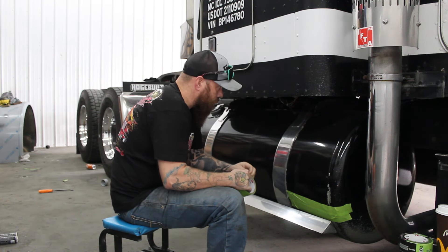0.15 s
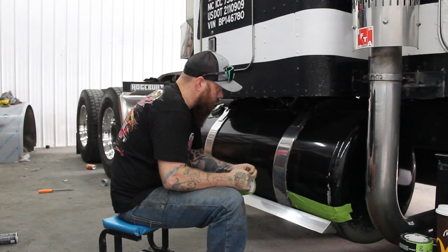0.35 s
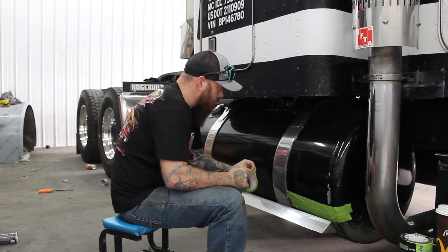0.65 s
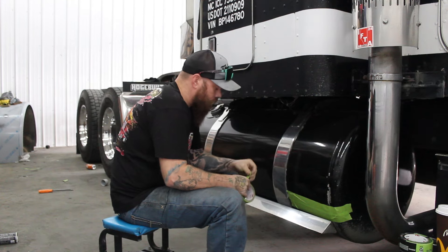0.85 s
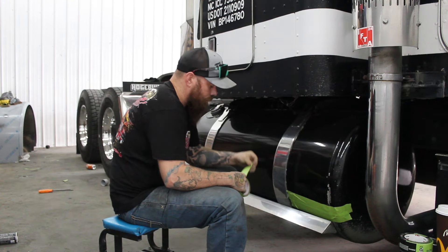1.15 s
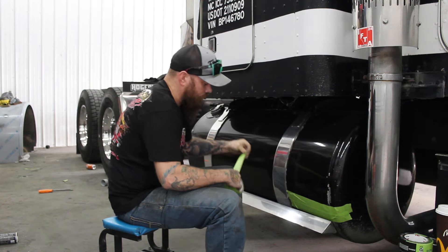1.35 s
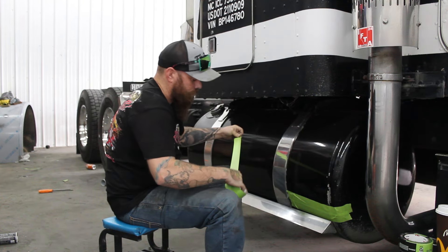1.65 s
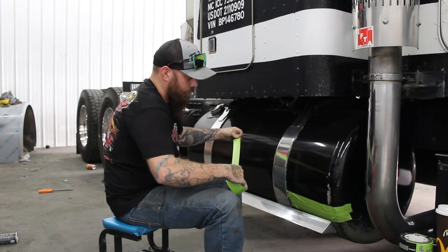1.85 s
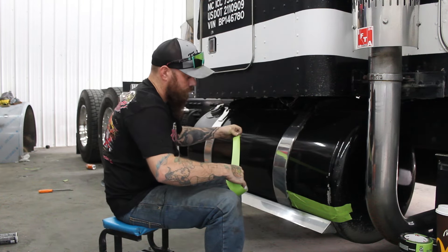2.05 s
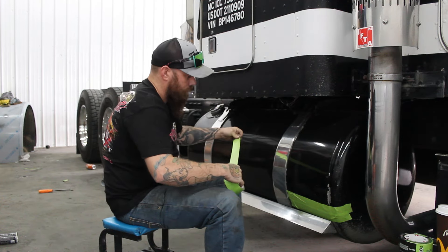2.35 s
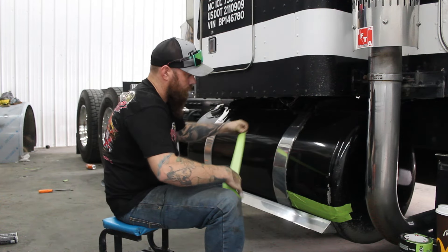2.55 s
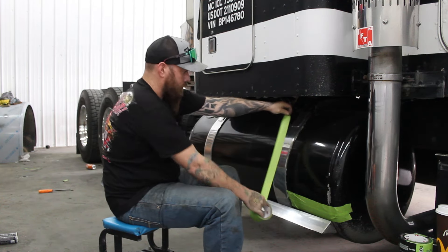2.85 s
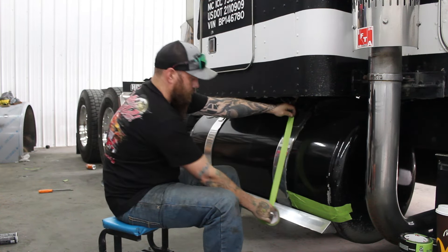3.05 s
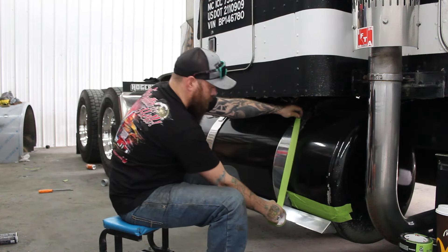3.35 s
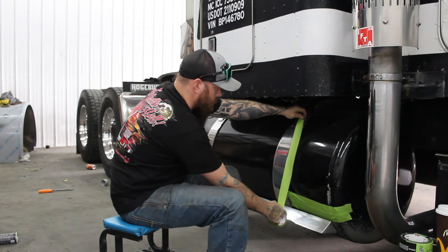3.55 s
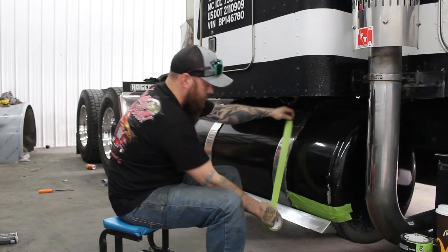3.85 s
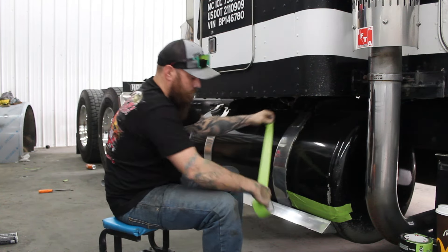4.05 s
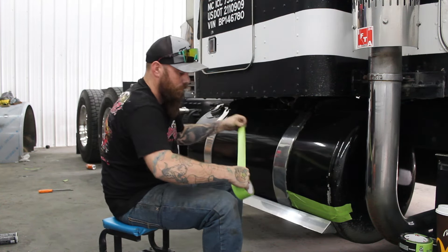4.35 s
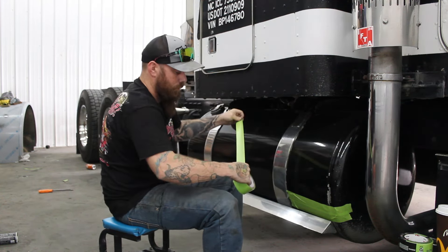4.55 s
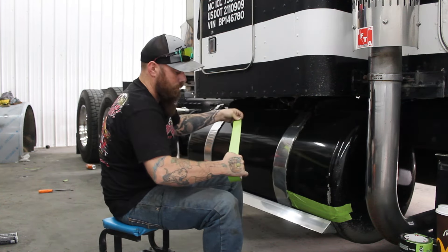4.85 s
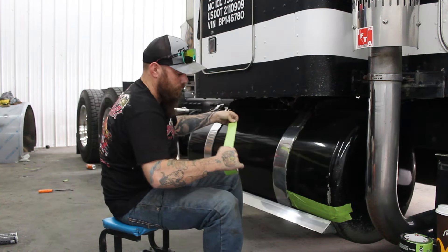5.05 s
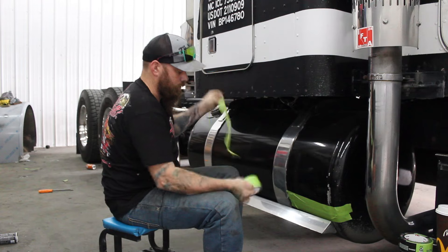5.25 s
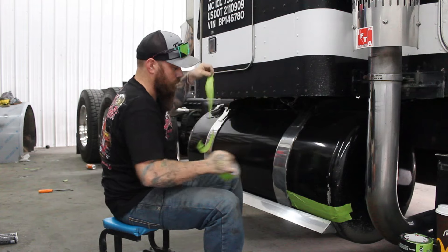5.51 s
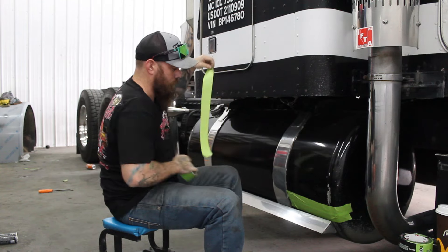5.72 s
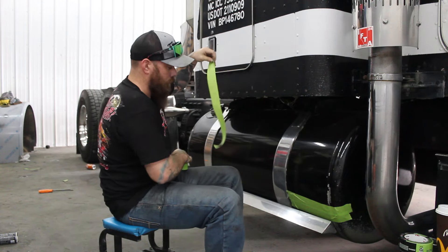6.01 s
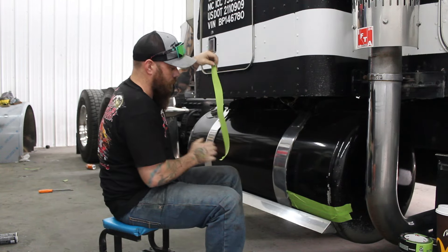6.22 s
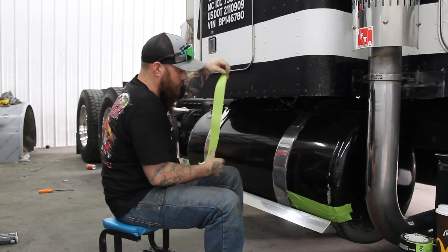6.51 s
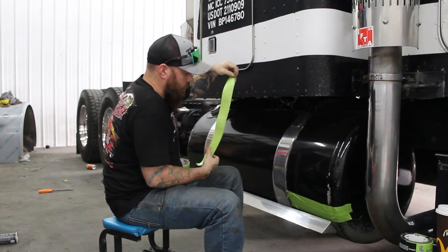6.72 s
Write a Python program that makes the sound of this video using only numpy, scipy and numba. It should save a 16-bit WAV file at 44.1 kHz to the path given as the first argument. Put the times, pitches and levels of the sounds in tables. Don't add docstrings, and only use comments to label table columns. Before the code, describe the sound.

Masking tape comes off its roll in a few violent, crackling pulls, each leaving over a second of hall reverberation. After the long rip, things calm down to soft finger crinkles and dull shuffles, then a dry triple snap, and later a sharp papery tear. Ventilation rumbles and hisses underneath with an early whine that fades. The mono microphone dips in level after the loudest rips.

```python
import sys
import numpy as np
from scipy import signal
from scipy.fft import rfft, irfft, next_fast_len
from scipy.io import wavfile
from scipy.ndimage import uniform_filter1d
from numba import njit

SR = 44100
rng = np.random.default_rng(int(sys.argv[2]) if len(sys.argv) > 2 else 0)


def output_pcm(signal):
    pcm = np.clip(np.atleast_2d(signal).T, -1, 1) * 32767
    wavfile.write(sys.argv[1], SR, np.round(pcm).astype(np.int16))


def field_ratio(decibels):
    return 10 ** (np.asarray(decibels, dtype=float) / 20)


N = 303270


def on_log(table, hz):
    rows = np.array(table, float)
    return np.interp(np.log(np.maximum(hz, 1)), np.log(rows[:, 0]), rows[:, 1])


def colour(x, gain_db):
    size = next_fast_len(len(x) + 2048)
    cepstrum = irfft(gain_db(np.fft.rfftfreq(size, 1 / SR)) * np.log(10) / 20, size)
    cepstrum[1:size // 2] *= 2
    cepstrum[size // 2 + 1:] = 0
    return irfft(rfft(x, size) * np.exp(rfft(cepstrum)), size)


def unit(x):
    return x / np.sqrt(np.mean(x ** 2))


def band(x, hz, width):
    return signal.lfilter(*signal.iirpeak(hz, hz / width, fs=SR), x)


def half_octave(hz, centre):
    return np.clip(1 - 2 * np.abs(np.log2(np.maximum(hz, 1) / centre)), 0, 1)


def walk(rate):
    hold = int(SR / rate)
    levels = np.repeat(rng.standard_normal(N // hold + 1), hold)
    return uniform_filter1d(uniform_filter1d(levels, hold), hold)[:N]


def air():
    # (frequency [Hz], density [dB per Hz])
    density = [(15, -48), (25, -11), (75, -0.5), (168, -7.5), (208, -6.5), (287, -10.5), (386, -12),
               (418, -6.5), (518, -11.5), (1040, -13.5), (1470, -15), (1640, -16.5), (2030, -17.5),
               (15200, -33.5)]
    # (time [s], level [dB])
    rumble = [(0, 1.5), (1.5, 6.5), (2.4, -2.5), (6.9, -3)]
    swell_db = np.interp(np.arange(N) / SR, *np.transpose(rumble))
    hz = np.fft.rfftfreq(N, 1 / SR)
    noise = rfft(rng.standard_normal(N)) * field_ratio(on_log(density, hz))
    scale = np.std(irfft(noise, N))
    out = np.zeros(N)
    for centre in 22 * 2 ** np.arange(0, 10, .5):
        bass = 1 / (1 + (centre / 700) ** 2)
        level_db = bass * swell_db + (.4 + 1.5 * bass) * walk(5)
        out += irfft(noise * half_octave(hz, centre), N) * field_ratio(level_db)
    return out / scale * field_ratio(-55.5)


def whine():
    # (time [s], level [dB])
    fade = [(0, -61.5), (0.699, -62.5), (1.499, -73), (6.9, -78)]
    tone = unit(band(rng.standard_normal(N), hz=462, width=24.87))
    return tone * field_ratio(np.interp(np.arange(N) / SR, *np.transpose(fade)))


def hall():
    # (frequency [Hz], t60 [s])
    t60 = [(100, 1.28), (300, 0.77), (800, 1.0373), (2500, 1.28), (4500, 1.0962), (6400, 0.783),
           (9000, 0.6642), (13000, 0.36)]
    # (frequency [Hz], level [dB])
    tail_db = [(100, 0.0078), (500, 0.00081), (2000, 0.008), (5000, 0.0011), (10000, 0.0073),
               (15000, 0.017)]
    # (delay [ms], level [dB])
    echoes = [(11, -11.5), (29, -19), (47, -20), (58, -22.5)]
    build_ms, diffuse_db = 18, -2
    s = np.arange(2 * SR) / SR
    noise = rng.standard_normal(len(s))
    spectrum, hz = rfft(noise), np.fft.rfftfreq(len(s), 1 / SR)
    tail = np.zeros(len(s))
    for centre in 60 * 2 ** np.arange(0, 8.5, .5):
        fade = field_ratio(on_log(tail_db, centre) - 60 * s / on_log(t60, centre))
        tail += irfft(spectrum * half_octave(hz, centre), len(s)) * fade
    tail *= (1 - np.exp(-s * 1000 / build_ms)) * field_ratio(diffuse_db) / np.sqrt(SR / 10)
    smear = np.exp(-np.arange(64) / 20) / np.sqrt(10)
    for ms, db in echoes:
        at = int(ms * SR / 1000)
        tail[at:at + 64] += field_ratio(db) * noise[at:at + 64] * smear
    return tail


def fibres():
    snaps_per_s, spread_db = 16000, 1.6
    when, sign, size = rng.random(N), rng.standard_normal(N), rng.exponential(size=N)
    return unit((when < snaps_per_s / SR) * sign * field_ratio(spread_db * size))


def envelope(length_ms, share, longest_ms=60):
    swell_ms = max(min(share * length_ms, longest_ms), .3)
    fade_ms = max(length_ms - swell_ms, .5)
    ms = np.arange(int((5 * length_ms + 25) * SR / 1000)) * 1000 / SR
    swell = np.clip(ms / swell_ms, 0, 1) ** 0.72
    return swell * np.exp(-(np.maximum(ms - swell_ms, 0) / fade_ms) ** 1.35)


def tape(snaps, slips, spectrum, share, longest_ms, drum_db):
    crackle, push = np.zeros(N + 2 * SR), np.zeros(N + 2 * SR)
    for start, length_ms, db, tilt_db in slips:

        def gain_db(hz):
            return on_log(spectrum, hz) + tilt_db * np.log2(np.clip(hz, 150, 12000) / 3000)

        at, force = int(start * SR), envelope(length_ms, share, longest_ms)
        end = at + len(force)
        loudness = np.sqrt(np.mean(field_ratio(2 * gain_db(np.linspace(0, SR / 2, 512)))))
        burst = np.resize(snaps[at:], len(force)) * force * field_ratio(db)
        crackle[at:end] += colour(burst, gain_db)[:len(force)] / loudness
        push[at:end] += burst * field_ratio(drum_db)
    return crackle[:N], push[:N]


def pitched(snaps, events, sharpness):
    out = np.zeros(N + 2 * SR)
    for start, length_ms, db, hz in events:
        at, force = int(start * SR), envelope(length_ms, share=0.53)
        tone = unit(band(np.resize(snaps[at:], len(force)), hz, hz / sharpness))
        out[at:at + len(force)] += tone * force * field_ratio(db)
    return out[:N]


def shuffle(snaps):
    # (time [s], length [ms], level [dB], brightness [dB per octave])
    rubs = [(3.474, 25, -50, -1.3), (3.500, 28, -53.5, -3), (3.548, 29, -60, -6), (3.600, 74, -58.5, -5.5),
            (3.780, 29, -60, -0.4), (4.196, 23, -58, -3), (4.245, 34, -56, 3), (5.300, 90, -48, -4)]
    # (frequency [Hz], density [dB per Hz])
    spectrum = [(90, -27.5), (180, 5), (400, -1.5), (1000, -0.5), (2000, -15), (5000, -26), (15000, -44)]
    return tape(snaps, rubs, spectrum, share=0.292, longest_ms=36, drum_db=-40)


def rustle(snaps):
    # (time [s], length [ms], level [dB], brightness [dB per octave])
    chirps = [(2.580, 7, -49.5, 1.5), (2.697, 15, -48.5, 3), (2.710, 73, -53, 4), (3.671, 7.7, -47.5, 8),
              (3.698, 7.9, -48, 3), (3.716, 11, -52, 8), (3.731, 13, -46, 5), (3.744, 9.6, -43.5, 6.5),
              (3.873, 9, -51, 9), (3.900, 150, -54.5, 3.5), (4.016, 6, -41.5, 4.5), (4.024, 10, -45.5, 1.2),
              (4.040, 68, -58, 2.5), (4.196, 8, -50, 1.5), (5.778, 5.9, -48, -11), (5.835, 70, -53, 2.5),
              (5.948, 8.6, -54.5, 5.5), (6.448, 11, -54, -5.5), (6.819, 4, -54, -4), (6.845, 36, -47.5, 5)]
    # (frequency [Hz], density [dB per Hz])
    spectrum = [(100, -34), (300, 11.5), (1000, 8), (2500, 2), (4500, -3.5), (7000, -12), (10000, -15),
                (15000, -20.5)]
    return tape(snaps, chirps, spectrum, share=0.18, longest_ms=40, drum_db=-19)


def chirping(snaps):
    # (time [s], length [ms], level [dB], pitch [Hz])
    chirps = [(2.579, 7.4, -55, 3410), (3.474, 24, -51.5, 1500), (3.742, 9, -49.5, 3600),
              (3.776, 9, -53, 2400), (4.016, 16, -50, 9600), (4.024, 57, -54, 2240), (4.030, 47, -56, 620),
              (4.195, 41, -54, 890), (4.3415, 6.5, -22.5, 3760), (4.351, 9, -27.5, 7000),
              (5.298, 15, -27, 4500)]
    return pitched(snaps, chirps, sharpness=3.8)


def flap(snaps):
    # (time [s], length [ms], level [dB], pitch [Hz])
    flaps = [
        (1.200, 240, -36, 130),
        (1.231, 111, -26.5, 189.7),
        (1.415, 78, -30.5, 124),
        (1.425, 85, -24, 200),
        (1.443, 35, -15, 382),
        (3.515, 120, -57, 185),
    ]
    return pitched(snaps, flaps, sharpness=11)


def tugs(snaps):
    # (time [s], length [ms], level [dB])
    jerks = [
        (.736, 40, -14.5),
        (1.120, 19.7, -21),
        (1.149, 14, -25),
        (1.225, 15, -22),
        (1.274, 76, -25),
        (1.432, 28, -18.5),
        (1.443, 37, -14),
    ]
    force = np.zeros(N + SR)
    for start, length_ms, db in jerks:
        shape = envelope(length_ms, share=0.45, longest_ms=15) * field_ratio(db)
        force[int(start * SR):][:len(shape)] += shape
    return force[:N] * snaps


def drum(push):
    # (frequency [Hz], width [Hz], level [dB])
    modes = [(403.5, 35, 0.5), (420, 27, -4), (516.4, 73, -2.5), (610, 70, -10), (774, 48, -6.5)]
    return sum(field_ratio(db + 24.5) * band(band(push, hz, width), hz, 3 * width) for hz, width, db in modes)


def steel(near, push):
    # (frequency [Hz], width [Hz], level [dB])
    tank = [(382, 2.1, 0), (405, 8, -10), (448, 9.5, -7)]
    # (frequency [Hz], width [Hz], level [dB])
    skin = [(1444, 3, 9.5), (1843, 3, 8), (2147, 3.5, 8.5), (2604, 3.5, 9), (3008, 5.8, 8), (3225, 3.5, 10),
            (3740, 4, 9), (4194, 3.5, 10.5), (4414, 4, 9), (5017, 3.5, 10), (5430, 5, 8.5)]
    boom = sum(field_ratio(db + 33.5) * band(band(push, hz, width), hz, 60) for hz, width, db in tank)
    return boom + sum(field_ratio(db) * band(near, hz, width) for hz, width, db in skin)


def picking(snaps):
    # (time [s], length [ms], level [dB], brightness [dB per octave])
    slips = [
        (.0295, 8, -24.5, 4.5),
        (.036, 22, -21.5, -1),
        (.056, 40, -40, -3),
    ]
    # (frequency [Hz], density [dB per Hz])
    spectrum = [(300, -46), (700, -25), (1200, -15.5), (1800, -4.5), (2600, -7.5), (3700, -9), (6500, -9.5),
                (10600, -14), (15500, -20.5)]
    return tape(snaps, slips, spectrum, share=.45, longest_ms=11, drum_db=-30)


def snapping(snaps):
    # (time [s], length [ms], level [dB], brightness [dB per octave])
    slips = [
        (4.320, 19, -46, -0.4),
        (4.3418, 7.9, -22.5, 0.1),
        (4.352, 13.4, -21, 0.6),
        (4.372, 19, -22, 0.55),
    ]
    # (frequency [Hz], density [dB per Hz])
    spectrum = [(100, -33), (200, -12.5), (620, -5.5), (1170, -9), (1900, -8), (2500, -12), (3800, -5.5),
                (4800, -4), (6000, -13), (7040, -4.5), (8500, -8.5), (9500, -14), (15500, -17)]
    return tape(snaps, slips, spectrum, share=.13, longest_ms=5, drum_db=-25.5)


def tearing(snaps):
    # (time [s], length [ms], level [dB], brightness [dB per octave])
    slips = [
        (5.2345, 5, -26, 0.8),
        (5.239, 20, -25, 0.6),
        (5.251, 25.6, -14.5, 0.12),
        (5.292, 10.5, -22.5, 1.7),
        (5.308, 24.6, -22.5, 1.8),
    ]
    # (frequency [Hz], density [dB per Hz])
    spectrum = [(100, -8.5), (200, -18), (393, -9), (800, -12), (1100, -6), (2400, -7.5), (3200, -3.5),
                (4700, -3.5), (6200, -4.5), (8500, -6.5), (11100, -7), (15500, -14.5)]
    return tape(snaps, slips, spectrum, share=0.27, longest_ms=9, drum_db=-37)


def first_rip(snaps):
    # (time [s], length [ms], level [dB], brightness [dB per octave])
    slips = [
        (.620, 110, -51.5, 7),
        (.690, 19, -52.5, 3),
        (.700, 16, -22.5, 3),
        (.708, 16, -12.5, 2.5),
        (.718, 10.4, -10.5, 0.4),
        (.729, 10, -7, 0.5),
        (.740, 11, -3, -0.3),
        (.750, 4.7, -4.5, -0.7),
    ]
    # (frequency [Hz], density [dB per Hz])
    spectrum = [(300, -50.5), (500, -27.5), (700, -27.5), (990, -9.5), (1200, -12), (2000, -4.5),
                (2600, -8.5), (3800, -7), (4400, -7), (13100, -17), (15500, -19)]
    return tape(snaps, slips, spectrum, share=.45, longest_ms=9.7, drum_db=-42)


def stutter(snaps):
    # (time [s], length [ms], level [dB], brightness [dB per octave])
    slips = [
        (1.1195, 19, -11, 1.1),
        (1.1485, 16, -6.5, 0.26),
        (1.1735, 18, -7, -0.079),
        (1.1975, 20.5, -6.5, -0.43),
        (1.2235, 21, -9.5, -0.2),
        (1.2485, 23.7, -10.5, -0.8),
        (1.2735, 70, -16, -0.9),
    ]
    # (frequency [Hz], density [dB per Hz])
    spectrum = [(100, -30), (250, -13), (373, -15.5), (560, -9.5), (784, -11), (1030, -3), (1230, -8),
                (1520, -4.5), (2990, -5.5), (13200, -14), (15500, -24.5)]
    return tape(snaps, slips, spectrum, share=0.5, longest_ms=13, drum_db=-28)


def long_rip(snaps):
    # (time [s], length [ms], level [dB], brightness [dB per octave])
    slips = [
        (1.4035, 10, -13.5, 0.5),
        (1.412, 27, -11.5, -1.3),
        (1.429, 53, -11, 0.2),
        (1.452, 64, -9.5, 0.3),
        (1.482, 50, -11.5, 1.3),
        (1.508, 57, -18.5, 0.6),
        (1.533, 18, -19, 1.5),
        (1.556, 36, -14.5, 0.7),
    ]
    # (frequency [Hz], density [dB per Hz])
    spectrum = [(53, -47.5), (90, -31), (188, -6), (255, -9.5), (376, -8.5), (690, -4.5), (1270, -5),
                (6300, -9.5), (13500, -15.5), (16000, -29.5)]
    return tape(snaps, slips, spectrum, share=0.26, longest_ms=15, drum_db=-32)


def singing(snaps):
    # (time [s], length [ms], level [dB], pitch [Hz])
    slips = [(.040, 27, -31, 2130), (.042, 18, -29, 3840), (.716, 18, -11.5, 2130), (.727, 18, -7, 3794),
             (.709, 18, -20.5, 2958), (0.73, 36, -9.5, 2960), (1.15, 7, -17.5, 2780), (1.175, 17, -9, 2990),
             (1.201, 13, -25, 2060), (1.43, 12, -23, 1370), (1.455, 12, -9, 2970), (1.458, 10, -21.5, 6230),
             (5.258, 9, -20.5, 3200)]
    return pitched(snaps, slips, sharpness=21)


def radiated(snaps):
    gestures = [picking, first_rip, stutter, long_rip, snapping, tearing, rustle, shuffle]
    crackle, push = np.sum([gesture(snaps) for gesture in gestures], axis=0)
    push = push + tugs(snaps)
    strip = crackle + chirping(snaps) + flap(snaps) + drum(push)
    no_bass = signal.butter(3, 110, "high", fs=SR, output="sos")
    return signal.sosfilt(no_bass, strip), singing(snaps), push


def scene():
    snaps = fibres()
    front, song, push = radiated(snaps)
    back, back_song, _ = radiated(snaps[::-1])
    song_to_hall = field_ratio(-8.5)
    front_wet = signal.fftconvolve(front + song_to_hall * song, hall())
    back_wet = signal.fftconvolve(back + song_to_hall * back_song, hall())
    wet = (front_wet + back_wet)[:N] / np.sqrt(2)
    mono = front + song + wet + steel(front, push) + air() + whine()
    return np.array([mono, mono])


@njit
def duck(over_db, attack, hold, release):
    cut, wait, out = 0., 0., np.empty(len(over_db))
    for i in range(len(over_db)):
        if over_db[i] > cut:
            cut, wait = cut + attack * (over_db[i] - cut), hold
        elif wait > 0:
            wait -= 1
        else:
            cut -= release * cut
        out[i] = cut
    return out


def band_limit(x):
    return signal.sosfilt(signal.butter(12, 16460, fs=SR, output="sos"), x)


def record(dry):
    limit_db, attack_ms, hold_ms, release_ms = -15.5, 21, 100, 285
    x = dry - .45 * band(dry, 11350, 200)
    power = signal.lfilter([.006], [1, -.994], x[0] ** 2)
    over_db = 10 * np.log10(power + 1e-12) - limit_db
    cut_db = duck(over_db, 1000 / (attack_ms * SR), hold_ms * SR / 1000, 1000 / (release_ms * SR))
    x = .95 * np.tanh(x * field_ratio(-cut_db) / .95)
    x = signal.sosfilt(signal.cheby1(12, .3, 15250, fs=SR, output="sos"), x)
    return band_limit(x)


dry = scene()
out = record(dry)
output_pcm(out)
```